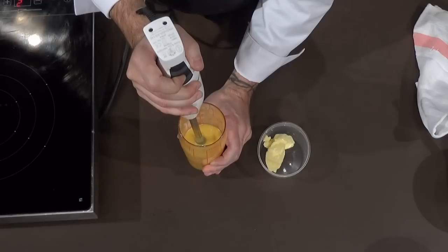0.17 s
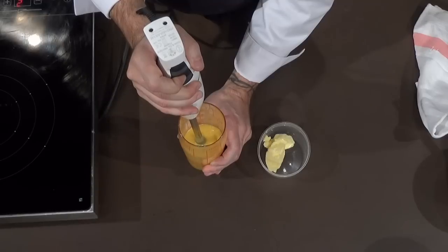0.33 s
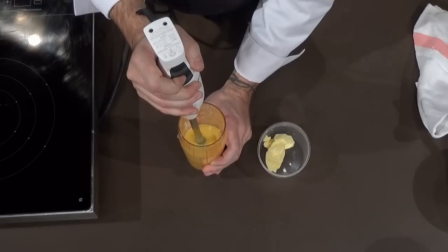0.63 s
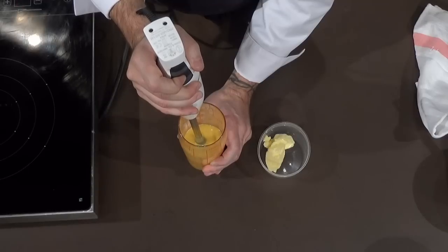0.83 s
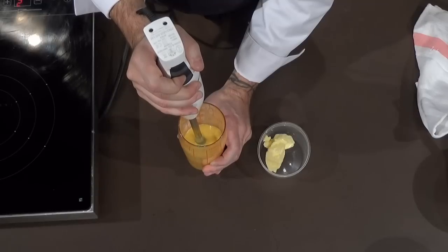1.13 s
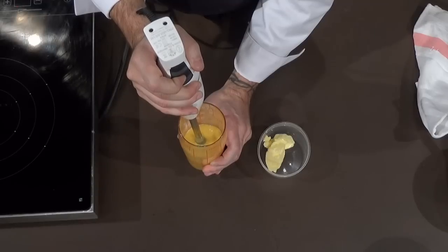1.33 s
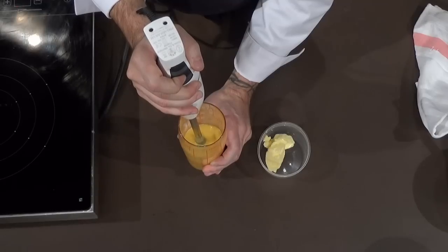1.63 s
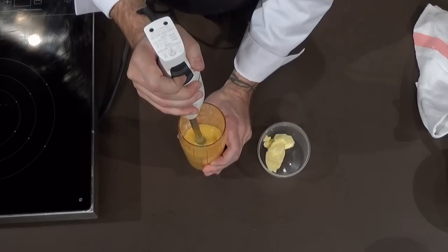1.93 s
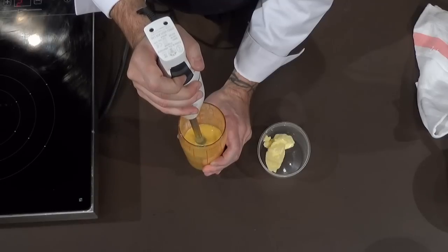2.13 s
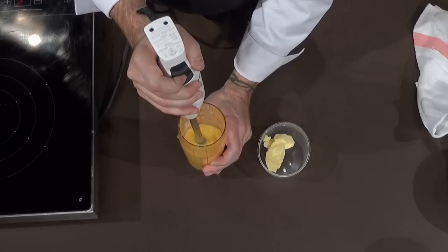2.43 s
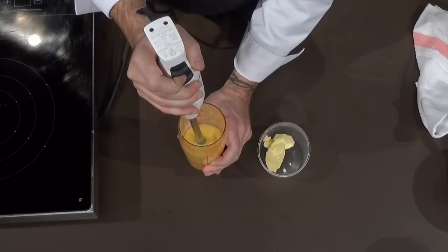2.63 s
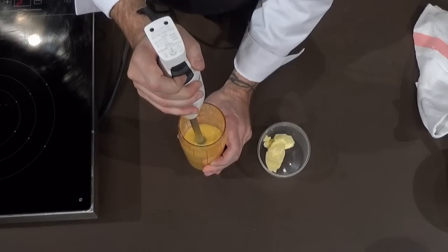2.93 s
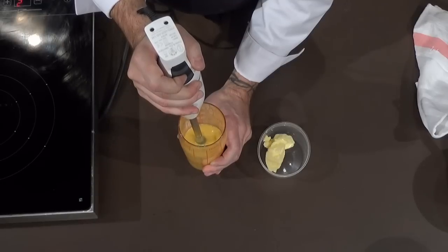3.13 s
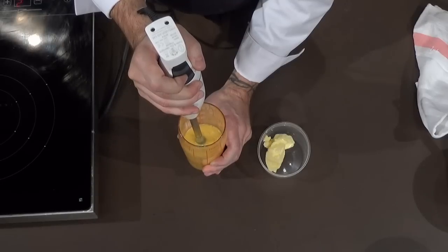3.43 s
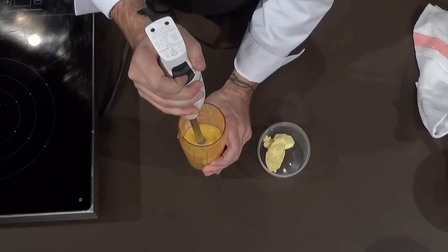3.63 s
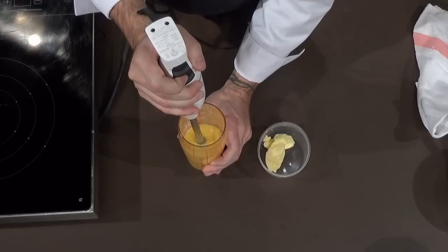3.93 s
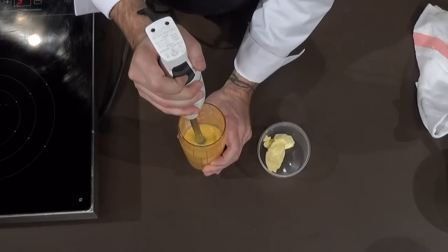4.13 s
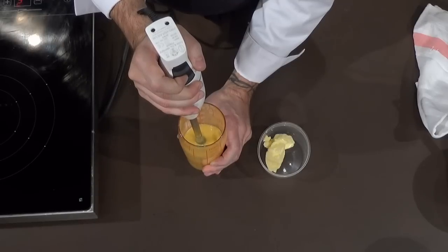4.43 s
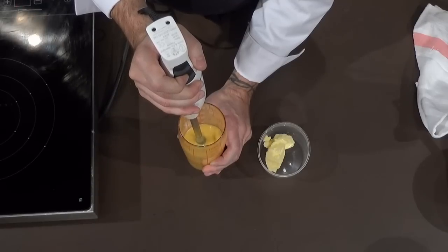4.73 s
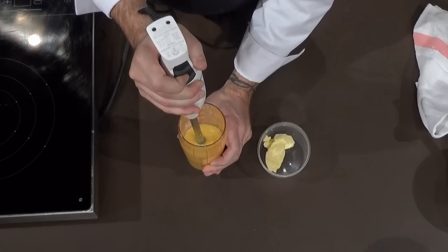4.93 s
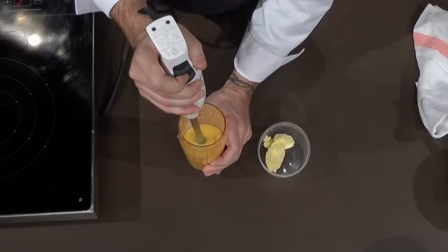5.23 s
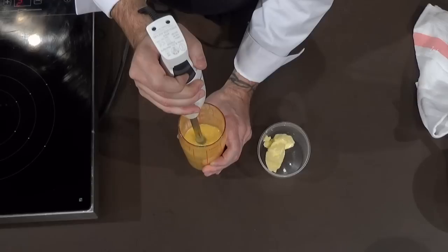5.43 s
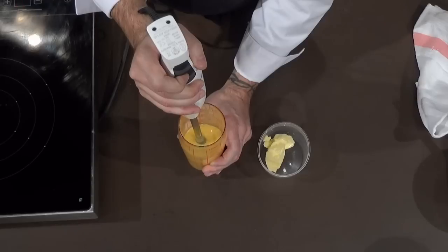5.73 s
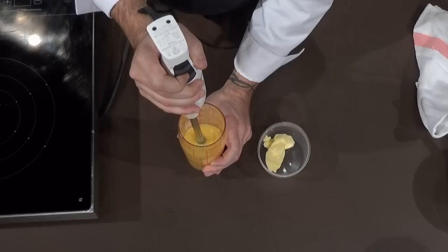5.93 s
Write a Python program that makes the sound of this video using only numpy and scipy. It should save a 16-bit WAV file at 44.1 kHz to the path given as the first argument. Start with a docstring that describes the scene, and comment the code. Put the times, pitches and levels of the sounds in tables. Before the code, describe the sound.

A stick blender is already running at 0 s, close and dry, in a tall plastic beaker of custard. Loudest is a hollow howl around 720-750 Hz, fluttering fast and irregularly as air pockets choke and burst. Below it lie low shaft hum, buzzing motor whine with a high edge near 2.9 kHz, brush hiss and a rapid bearing rattle with scattered bright knocks. The rattle is rougher from about 0.9 to 2.6 s. Around 2.55-2.6 s the beaker is softly bumped with a strong howl burst; by 2.8 s the load has eased, pitch rises slightly and the whine is clearer. At 3.9-4.15 s four quick slurps fizz with small bubbles. The howl surges at 5.27 and 5.4 s, around a brief dip at 5.2 s, then continues unevenly. At 6.02 s the motor is switched off and the shaft just begins coasting down.

```python
"""A loud, fluttering howl comes first: a stick blender in a tall plastic beaker of custard, heard from
close by. The blade's pushes, turbulence and bursting air pockets ring the air column.
Beneath it the mains-fed motor hums and whines, its brushes hiss and its shaft rattles once a turn.
The load eases part-way through, later the blade briefly sucks air into a fizz of small bubbles,
and at the very end the motor is switched off and the shaft starts to coast down."""
import sys
import numpy as np
from scipy import signal
from scipy.fft import rfft, irfft, next_fast_len
from scipy.io import wavfile
from scipy.ndimage import uniform_filter1d

SR = 44100
rng = np.random.default_rng(int(sys.argv[2]) if len(sys.argv) > 2 else 0)


def to_wav(s):
    """Save 16-bit WAV."""
    ch = np.atleast_2d(s).T  # columns
    pcm = np.round(np.clip(ch, -1, 1) * 32767)  # PCM
    wavfile.write(sys.argv[1], SR, pcm.astype(np.int16))


N = 267687
T = np.arange(N) / SR
MAINS_HZ = 50
# shaft turns per second under load and once the load has eased
LOADED_HZ, FREE_HZ = 177.75, 180.9
# moment the button is let go
OFF_S = 6.02
# the blade sucks air into the vortex: (middle [s], half length [s], level [dB])
SLURPS = [(3.924, 0.032, -33), (3.995, .03, -37), (4.06, 0.027, -33), (4.126, 0.024, -32)]


def gain_of(db):
    """Decibels to gain."""
    return 10 ** (np.asarray(db) / 20)


def evened(x):
    """Scaled to rms 1."""
    return x / np.sqrt(np.mean(x ** 2) + 1e-20)


def curve(rows):
    """Rows of (s, value) joined by straight lines."""
    return np.interp(T, *np.transpose(rows))


def read(points, hz):
    """Rows of (Hz, value) read on a log-frequency axis."""
    f, value = np.transpose(points)
    return np.interp(np.log(hz + 1), np.log(f + 1), value)


def drift(rate_hz):
    """Slow random wandering of rms near 1, weak above rate_hz."""
    hz = np.fft.rfftfreq(2048, T[-1] / 2048)
    slow = irfft(rfft(rng.standard_normal(size=2048)) / (1 + (hz / rate_hz) ** 2))
    return evened(np.interp(T, np.linspace(0, T[-1], len(slow)), slow))


def swell(middle_s, half_s):
    """A smooth rise and fall of height 1."""
    return np.exp(-((T - middle_s) / half_s) ** 2)


def ring(points, modes=(), size=4096):
    """Causal impulse response of a body: a broad spectrum lifted at its resonances."""
    hz = abs(np.fft.fftfreq(size, 1 / SR))
    db = read(points, hz)
    for f, width, lift in modes:
        db = db + lift / (1 + (2 * (hz - f) / width) ** 2)
    # minimum phase follows from the log spectrum
    return np.fft.ifft(np.exp(np.conj(signal.hilbert(np.log(gain_of(db)))))).real


def through(x, response):
    """A sound passed through an impulse response."""
    return signal.oaconvolve(x, response)[:N]


def filtered(x, order, hz, kind):
    """Zero-phase filter, so that the parts of a split sound stay aligned."""
    return signal.sosfiltfilt(signal.butter(order, hz, kind, fs=SR, output="sos"), x)


def strikes(rows, response):
    """One blow a row of (s, peak dB), each with the same response."""
    s, db = np.transpose(rows)
    blows = np.bincount(np.round(s * SR).astype(int), gain_of(db), N)[:N]
    return through(blows, response / abs(response).max())


def contacts(rows, body, decay_s):
    """Each contact is a short burst of rubbing that rings the body."""
    burst = strikes(rows, np.exp(-T[:3000] / decay_s)) * rng.standard_normal(N)
    return through(burst, body / np.linalg.norm(body)) / 2


def load():
    """Drag of the custard on the blade: 1 at first, 0 once it has eased."""
    ease_s, ease_length_s = 2.57, .27
    return 1 - np.clip((T - ease_s) / ease_length_s, 0, 1)


def powered():
    """Motor current: 1 until the button is let go, then dying away."""
    fade_s = .013
    return np.exp(-np.maximum(T - OFF_S, 0) / fade_s)


def sucking():
    """Draw of air at the blade: ramps up to 1 by the first slurp, back to 0 as the last slurp ends."""
    onset_s, release_s = 0.18, 0.023
    start = SLURPS[0][0] - SLURPS[0][1]
    end = SLURPS[-1][0] + SLURPS[-1][1]
    return np.clip(np.minimum(1 + (T - start) / onset_s, (end - T) / release_s), 0, 1)


def treble_hiss(level_db=-67.0):
    """Thin steady hiss at the top: independent filtered noise in each channel."""
    # relative spectrum: (frequency [Hz], density [dB per Hz])
    spectrum = [(20, -60), (8500, -53), (9800, -29), (12000, -2), (15500, -8)]
    ears = [through(ear, ring(spectrum)) for ear in rng.standard_normal((2, N))]
    return gain_of(level_db) * evened(np.array(ears))


def stereo_difference(x, t60_s=0.19):
    """Faint diffuse stereo difference: a short noise tail, opposite in sign left and right."""
    # difference by pitch: (frequency [Hz], level against the direct sound [dB])
    side_level = [(60, -70), (150, -42), (400, -73), (720, -34.5), (1200, -71), (2400, -52), (4400, -64),
                  (16000, -60)]
    tail = rng.standard_normal(size=12000) * gain_of(-60 * T[:12000] / t60_s)
    diffuse = through(x, tail / np.linalg.norm(tail))
    return np.array([[1], [-1]]) * through(diffuse, ring(side_level))


def beaker_bumps(decay_s=0.0091):
    """The bell bumps the beaker around the start of the easing load: short rubs ring the plastic."""
    # bumps: (time [s], relative peak [dB])
    bumps = [(2.551, -27), (2.6, -20), (2.62, -38)]
    # plastic beaker on the counter, relative: (frequency [Hz], density [dB per Hz])
    plastic = [(20, -20), (110, 1), (220, 1), (400, 4), (1000, 14.5), (1500, -8), (2100, 9), (3000, -3),
               (4200, -9), (8000, -14), (15000, -26)]
    return contacts(bumps, ring(plastic), decay_s)


def brushes(turns, mains, level_db=-42.5, throb=0.023, scrape=0.78, scrape_turns=0.1):
    """Hiss of carbon brushes and cooling air: noise pulsing at twice the mains, rasping once a turn."""
    # relative spectrum: (frequency [Hz], density [dB per Hz])
    air = [(100, -9.5), (700, 7), (1600, -1), (2350, 3.5), (2620, -7), (2790, 3.5), (2960, -2),
           (3300, -8.5), (3750, -3), (4150, -8), (4600, 0), (4850, -12), (5200, -8), (5800, -15.5),
           (15700, -23.5)]
    rasp = 1 + scrape * np.exp(-(turns % 1) / scrape_turns)
    hiss = rng.standard_normal(N) * (1 + throb * np.cos(mains)) * rasp
    return gain_of(level_db) * evened(through(hiss, ring(air)))


def sparks(turns, spread_hz=170):
    """Commutator sparking smears top lines into narrow bands of fizz that follow the shaft speed."""
    # bands: (multiple of the shaft speed, level [dB])
    bands = [(72, -66.5), (80, -68)]
    smooth = signal.butter(2, spread_hz, fs=SR, output="sos")
    out = np.zeros(N)
    for k, db in bands:
        flicker = evened(signal.sosfilt(smooth, rng.standard_normal(N)))
        out += gain_of(db) * flicker * np.cos(2 * np.pi * round(k) * turns)
    return np.sqrt(2) * out


def whine(turns, mains, sway=0.21, loaded_sway=0.51, level_db=0.8, loaded_db=1.5, loaded_top_db=-3):
    """Slots and commutator sing at shaft multiples; pulsing torque adds side tones, load dulls the top."""
    # main motor lines, before the shared lift:
    # (multiple of the shaft speed, relative level [dB], depth of the mains throb [0-1])
    strong_lines = [(6, -59, .1), (7, -59, .1), (11, -65, .1), (13, -68, .1), (15, -69, .2),
                    (16, -47.7, .55), (18, -67, .2), (19, -71, .2), (20, -70, .2), (22, -69, .2),
                    (24, -65.5, .3), (31, -66, .9), (32, -66.5, .5), (38, -75, .2), (44, -79, .2),
                    (46, -71, .3), (47, -74, .3), (48, -77, .5), (56, -73.5, .5), (58, -78, .2),
                    (61, -78, .2), (64, -74, .5), (70, -80, .3), (72, -73, .7), (73, -79, .2),
                    (79, -80, .5), (80, -77, .6)]
    # weak lines at the other multiples: (frequency [Hz], relative level of each [dB])
    weak_lines = [(1200, -73), (3000, -63), (5000, -83), (9000, -84), (11000, -75), (13000, -87),
                  (15500, -87)]
    # the slot whine sags under load and swells as the motor runs free: (time [s], level change [dB])
    slot_swell = [(0, -2), (1, -4), (2.2, -3.5), (2.55, -4.5), (2.72, 0), (3.5, 1), (3.7, -2.5),
                  (4.2, -1.5), (5.1, 1), (5.7, -1)]
    drag = load()
    swing = (sway + loaded_sway * drag) * np.sin(mains)
    lines = {k: (read(weak_lines, k * FREE_HZ), 0) for k in range(7, 87)}
    lines.update({round(k): (db, throb) for k, db, throb in strong_lines})
    out = np.zeros(N)
    for k, (db, throb) in lines.items():
        start, lag = 2 * np.pi * rng.random(2)  # each line takes its own path through the housing
        pulsing = 1 + throb * np.cos(mains + lag * (k > 20))
        # line 16 is twice the eight armature slots
        slot = gain_of(curve(slot_swell)) if k == 16 else 1
        dulled = 1 + (gain_of(loaded_top_db * k / 80) - 1) * drag
        tone = np.cos(2 * np.pi * k * turns + start + swing)
        out += gain_of(db) * slot * dulled * pulsing * tone
    return np.sqrt(2) * out * gain_of(level_db + loaded_db * drag)


def hum(turns, mains, second_db=-51, second_loaded_db=-3, second_wobble=1.0, mains_db=-60.5):
    """Unbalanced shaft shakes the handle, two blade arms stir unevenly, stator hums at twice the mains."""
    # shaft hum before the relief below: (time [s], level [dB])
    unbalance = [(0, -64.5), (.98, -64), (1.1, -57.5), (1.66, -55.5), (1.77, -59), (1.92, -49.5),
                 (2.2, -51.5), (2.34, -55), (2.45, -51), (3.5, -47), (5.2, -51), (5.7, -44.5)]
    relief_db = 10  # the shaft shakes less while the blade draws air
    shake_db = curve(unbalance) - relief_db * sucking()
    shaft = gain_of(shake_db + 1.26 * drift(9)) * np.cos(2 * np.pi * turns)
    arms_level = gain_of(second_db + second_loaded_db * load() + 3.2 * drift(4.3))
    arms = arms_level * np.cos(2 * np.pi * 2 * turns + second_wobble * drift(9))
    stator = powered() * gain_of(mains_db + 0.74 * drift(6)) * np.cos(mains)
    return np.sqrt(2) * (shaft + arms + stator)


def rattle_gain(waver_db=1.66, waver_hz=20):
    """Relative rattle strength: load and sideways pressure raise it, and it wavers with the hand."""
    # shaft pressed sideways: (start [s], end [s], relative rattle level [dB])
    presses = [(0, 0.24, -55), (0.917, 2.106, -52.5), (2.092, 2.61, -51), (4.57, 5.235, -56),
               (5.548, 6.023, -69)]
    rise_s, fall_s = 0.0068, 0.0083
    loaded_db, free_db = -55, -57  # relative, like the presses
    idle = gain_of(free_db + (loaded_db - free_db) * load())
    pressed = np.zeros(N)
    for start, end, db in presses:
        hold = np.clip(np.minimum((T - start) / rise_s, (end - T) / fall_s), 0, 1)
        pressed += gain_of(db) * hold
    return np.sqrt(idle ** 2 + pressed ** 2) * gain_of(waver_db * drift(waver_hz))


def rattle(turns, mains, spread_db=1.4, decay_turns=0.11, bed=0.18, click=2.4, throb=0.37,
           level_db=5.0, knock_db=7.5, knock_hz=2500, rebound_db=-9, contact_s=0.0015):
    """Each turn the shaft clicks and scrapes in its bearing; hard knocks are brighter and rebound."""
    # hard knocks of the shaft, before the shared lift: (time [s], relative peak [dB])
    knocks = [(0.1977, -39.0), (0.94, -38.0), (1.0693, -42), (1.2101, -37), (1.2213, -36), (1.3004, -38.0),
              (1.39, -38.5), (1.6998, -34), (2.1896, -38.5), (2.2012, -38.5), (2.2517, -39.0), (2.318, -41),
              (2.4205, -41), (2.4711, -43), (2.4821, -36), (2.5214, -37), (2.9286, -40.5), (3.3211, -37),
              (3.4817, -37), (3.8905, -39.5), (3.9508, -40.0), (4.1502, -36), (4.2492, -38), (4.348, -36),
              (4.3709, -43), (4.4208, -41), (4.581, -40), (4.5925, -38.5), (4.7192, -40.0), (4.8412, -39.0),
              (4.8577, -37), (4.963, -38), (5.0015, -35), (5.0788, -43), (5.1509, -43), (5.189, -38),
              (5.2006, -38.5), (5.5605, -39), (5.6103, -40.5), (5.6212, -38.5), (5.6819, -38),
              (5.7318, -36), (5.753, -41.0), (5.8704, -38.5), (5.8904, -39.5), (5.952, -38), (5.9684, -36),
              (5.9915, -37), (6.0023, -40.5)]
    # steel shaft and bell, relative: (frequency [Hz], density [dB per Hz])
    steel_tone = [(200, -37), (1000, 10), (2300, -0.5), (3200, 1), (3800, -1.5), (5200, 0.5), (5800, -17.5),
                  (7000, -11), (7950, -15.5), (9700, -10), (11000, -16), (15500, -24)]
    # their ringing: (frequency [Hz], width [Hz], lift [dB])
    steel_modes = [(2388, 130, 14.5), (4240, 170, 2.5), (4460, 300, 4), (5010, 115, 8.5), (5370, 100, 9.5),
                   (6340, 115, 18.5), (6430, 140, 6.5), (6980, 150, 15.5), (7370, 140, 3), (7800, 200, 11),
                   (8580, 160, 15.5), (9200, 150, 9.5), (9350, 74, 10), (9980, 170, 15.5)]
    steel = ring(steel_tone, steel_modes)
    # one random force for each turn
    force = gain_of(spread_db * np.clip(rng.standard_normal(size=2000), -2, 1.2))[turns.astype(int)]
    scrape = (bed + force * np.exp(-(turns % 1) / decay_turns)) * rng.choice([-1., 1.], N)
    from_hit = (turns % 1 - .03) * SR / FREE_HZ  # in samples, at the free speed
    tick = np.sinc(.7 * from_hit) * np.exp(-(from_hit / 4) ** 2)
    drive = (scrape + click * force * tick) * (1 + throb * np.cos(mains))
    chatter = gain_of(level_db) * rattle_gain() * evened(through(drive, steel))
    bright = signal.sosfilt(signal.butter(2, knock_hz, "high", fs=SR, output="sos"), steel)
    # each rebound comes one free-speed turn later
    rebounds = [(s + 1 / FREE_HZ, db + rebound_db) for s, db in knocks]
    return chatter + gain_of(knock_db) * contacts(list(knocks) + rebounds, bright, contact_s)


def slurp(turns, bubbles_per_s=5000, trickle_db=-56, late_trickle_db=-50, chop=0.38):
    """Air drawn to the blade is chopped into small bubbles: a growing trickle, a swell for each slurp."""
    # fizz of the sucked air, relative: (frequency [Hz], density [dB per Hz])
    froth = [(100, -26.5), (340, 7), (450, 6), (600, -18), (800, 5), (1000, 18.5), (1130, 10.5),
             (1330, 15.5), (1550, -2), (1900, 1.5), (2400, -7), (4000, -24), (12000, -46)]
    pops = rng.standard_normal(N) * (rng.random(N) < bubbles_per_s / SR)
    chopped = pops * (1 + chop * np.cos(2 * np.pi * turns))
    power = sum(gain_of(db) ** 2 * swell(s, half) for s, half, db in SLURPS)
    trickle = gain_of(np.linspace(trickle_db, late_trickle_db, N))
    return np.sqrt(trickle ** 2 + power) * evened(through(chopped, ring(froth)))


def howl_db(waver_db=0.5, waver_hz=4):
    """Air column level: a slow rise as the custard is whipped, a random waver, and vortex surges."""
    # the vortex opens (+) or chokes (-): (middle [s], half length [s], level change [dB])
    surges = [(0.553, 0.019, -6), (1.75, 0.52, 1.3), (2.58, 0.13, 2.5), (2.904, 0.54, -1.85),
              (3.627, 0.04, -2), (3.93, 0.026, 8.5), (4.99, 0.067, 4.5), (5.183, 0.018, -9),
              (5.265, 0.017, 14), (5.399, 0.025, 14), (5.817, 0.31, 2.5), (6.07, 0.084, -4)]
    start_db, rise_db_per_s = -26, 0.2064
    steady = start_db + rise_db_per_s * T + waver_db * drift(waver_hz)
    return steady + sum(db * swell(s, half) for s, half, db in surges)


def gulps(howl, level_db=0.56, takeover=0.76, rise_share=0.4, fall_share=0.6,
          starve=0.52, starve_s=0.0038, lead_share=0.97):
    """Each air pocket briefly starves the blade, then bursts and swells the column in step with its ring."""
    # large air pockets, before the shared lift:
    # (time [s], relative peak [dB], length [s], pitch [Hz])
    pockets = [(0.065, -19.5, 0.034, 727), (0.329, -17.5, 0.015, 740), (0.448, -16.5, 0.016, 733),
               (0.506, -18.5, 0.027, 711), (0.615, -19.5, 0.013, 750), (0.863, -19.5, 0.012, 745),
               (0.932, -19.5, 0.016, 728), (1.021, -21.5, 0.033, 754), (1.139, -18, 0.014, 750),
               (1.345, -18.5, 0.024, 721), (1.626, -20.5, 0.039, 720), (1.66, -16, 0.0082, 739),
               (1.722, -16.5, 0.02, 723), (1.793, -18.5, 0.021, 747), (1.862, -16.5, 0.0088, 716),
               (1.984, -18.5, 0.012, 760), (2.063, -20.5, 0.018, 740), (2.248, -16.5, 0.015, 744),
               (2.401, -16, 0.011, 720), (2.459, -17.0, 0.011, 702), (2.56, -15, 0.014, 730),
               (2.582, -17.5, 0.018, 720), (2.605, -9.5, 0.013, 740), (2.628, -18.5, 0.019, 730),
               (2.698, -16.0, 0.014, 755), (2.877, -15, 0.0088, 753), (3.327, -17.5, 0.021, 740),
               (3.391, -15.5, 0.014, 758), (3.487, -14, 0.013, 744), (3.529, -16.5, 0.024, 752),
               (3.763, -18, 0.016, 752), (3.786, -18.5, 0.012, 737), (3.902, -18, 0.035, 753),
               (3.933, -19.5, 0.017, 720), (4.074, -19, 0.021, 720), (4.109, -20, 0.024, 748),
               (4.181, -18.0, 0.015, 780), (4.364, -17, 0.013, 770), (4.634, -15, 0.021, 743),
               (4.659, -19, 0.019, 718), (4.76, -18.5, 0.017, 722), (4.824, -19.5, 0.017, 737),
               (4.864, -15, 0.019, 722), (4.892, -19, 0.033, 745), (4.974, -17.5, 0.02, 733),
               (5.005, -19.5, 0.02, 735), (5.057, -18.5, 0.027, 720), (5.23, -18, 0.017, 726),
               (5.263, -18.5, 0.028, 736), (5.286, -16, 0.024, 762), (5.373, -10.5, 0.019, 723),
               (5.399, -16, 0.025, 722), (5.443, -19.5, 0.032, 723), (5.593, -19.5, 0.041, 720),
               (5.624, -18.0, 0.0094, 750), (5.65, -17.5, 0.015, 720), (5.687, -18.0, 0.025, 735),
               (5.726, -18.5, 0.024, 725), (5.768, -18.0, 0.017, 767), (5.822, -15, 0.013, 746),
               (5.858, -17.5, 0.016, 730), (5.942, -16.5, 0.018, 745), (6.017, -17.5, 0.023, 752)]
    out = howl.copy()
    for s, db, length_s, hz in pockets:
        near = slice(max(round((s - .07) * SR), 0), round((s + .07) * SR))
        age = T[near] - s
        width_s = length_s * np.where(age < 0, rise_share, fall_share)
        shape = np.exp(-(age / width_s) ** 2)
        starved = starve * np.exp(-((age + lead_share * length_s) / starve_s) ** 2)
        tone = np.exp(2j * np.pi * hz * age)
        # turn the burst to the phase of the howl around it
        tone *= np.exp(1j * np.angle(np.sum(howl[near] * shape * tone.conj())))
        kept = (1 - starved) * (1 - takeover * np.sqrt(shape))
        out[near] = out[near] * kept + gain_of(db + level_db) * shape * tone
    return out.real


def churn(turns, blade_wobble=0.21, wash_follow=0.17, wash_db=-0.83, late_skirt=0.44, slosh_hz=4,
          ceiling_db=8.0, wash_chop=0.1):
    """Turbulence and four blade pushes a turn sound the air column of the beaker."""
    # steady blade tone: (time [s], level against the turbulence [dB])
    blade_level = [(0, -13), (1.1, -24), (1.5, -7), (2.6, -7.5), (3.3, -12), (4.6, -16.5), (5.05, -6.5),
                   (5.4, -4.5), (6.07, -7)]
    # churned liquid, relative: (frequency [Hz], density [dB per Hz])
    liquid = [(20, -32), (60, -34.5), (130, -25), (230, -25.5), (275, -20.5), (320, -16), (500, -13.5),
              (740, -3), (900, -7), (1150, -18.5), (1500, -17.5), (2300, -31), (3200, -35), (8000, -62.5)]
    # air column and wall of the beaker: (frequency [Hz], width [Hz], lift [dB])
    beaker = [(343, 64, 8.5), (456.6, 35, 7), (528.8, 38, 8.5), (634, 80, 8.5), (718.2, 39, 8.5),
              (771.6, 68, 9), (849, 120, 6), (1045, 74, 7), (1245, 97, 3)]
    swirl = evened(through(rng.standard_normal(N), ring(liquid, beaker)))
    column = filtered(swirl, 2, [620, 880], "band")
    core = filtered(swirl, 2, [695, 785], "band")
    # the column rings more purely as the custard gets smooth
    skirt = 1 + (late_skirt - 1) * (T / T[-1]) ** 2
    ringing = core + skirt * (column - core)
    # its pitch sways with the sloshing surface
    sway = np.exp(2j * np.pi * np.cumsum(slosh_hz * drift(5)) / SR)
    blade = np.sqrt(2) * np.exp(1j * (2 * np.pi * 4 * turns + blade_wobble * drift(10)))
    blade_gain = gain_of(curve(blade_level)) * (1 + 0.52 * drift(28))
    howl = signal.hilbert(ringing, next_fast_len(N))[:N] * sway + blade_gain * blade
    # slow level swings are evened out, so that the level follows howl_db
    howl /= np.sqrt(uniform_filter1d(uniform_filter1d(howl.real ** 2, size=1700), size=1100))
    # remaining swells are softly capped
    excess = uniform_filter1d(abs(howl) ** 2, size=300) / gain_of(ceiling_db) ** 2
    howl /= (1 + excess ** 2) ** .25
    # the wash around the resonance follows the level only weakly; its upper part is chopped once a turn
    level = howl_db()
    upper = filtered(swirl, 3, 1150, "high")
    wash = swirl - column + wash_chop * np.cos(2 * np.pi * turns) * upper
    wash_level = level.mean() + wash_follow * (level - level.mean()) + wash_db
    return gulps(gain_of(level) * howl) + gain_of(wash_level) * wash


def stereo_phase(x):
    """Stereo phase: the left channel leads, mainly in the top treble."""
    # phase between the channels: (frequency [Hz], lead of the left channel [radians])
    lead_by_hz = [(20, 0.01), (9200, 0), (9900, 0.54), (11500, 1.66), (15000, 1.84)]
    size = next_fast_len(N + 2048)
    lead = np.exp(.5j * read(lead_by_hz, np.fft.rfftfreq(size, 1 / SR)))
    return irfft(rfft(x, size) * np.array([lead, lead.conj()]), size)[:, :N]


def scene(wander_hz=0.154, flutter_hz=0.1, coast_hz_per_s=210):
    """One shaft angle and one phase at twice the mains drive the blender, which is then spread to stereo."""
    drag = load()
    speed = FREE_HZ + (LOADED_HZ - FREE_HZ) * drag
    speed += wander_hz * (1 + drag) * drift(0.834) + flutter_hz * drift(21.2)
    # turns per second are lost steadily once the button is let go
    turns = np.cumsum(speed - coast_hz_per_s * np.maximum(T - OFF_S, 0)) / SR
    mains = 2 * np.pi * 2 * MAINS_HZ * T
    motor = brushes(turns, mains) + sparks(turns) + powered() * whine(turns, mains)
    motor += hum(turns, mains) + rattle(turns, mains)
    blender = beaker_bumps() + motor + slurp(turns) + churn(turns)
    return treble_hiss() + stereo_difference(blender) + stereo_phase(blender)


def record(dry):
    """The recorder's band limit: a steep low-pass."""
    edge_hz = 15740
    low_pass = signal.firwin(1023, edge_hz, window=("kaiser", 9), fs=SR)
    return signal.oaconvolve(dry, low_pass[None], "same")


dry = scene()
out = record(dry)
to_wav(out)
```